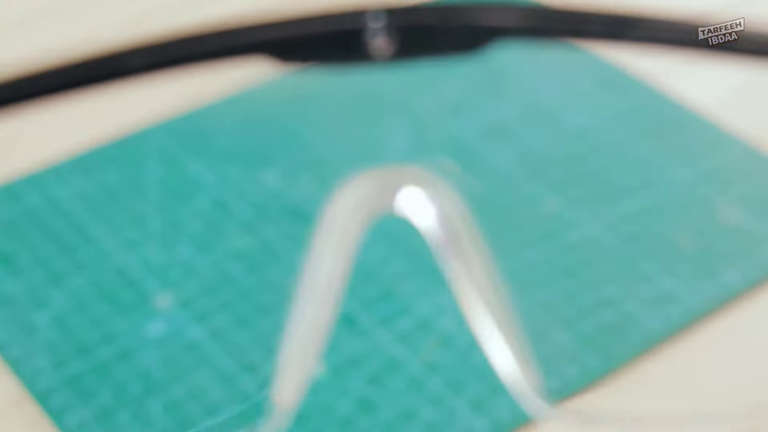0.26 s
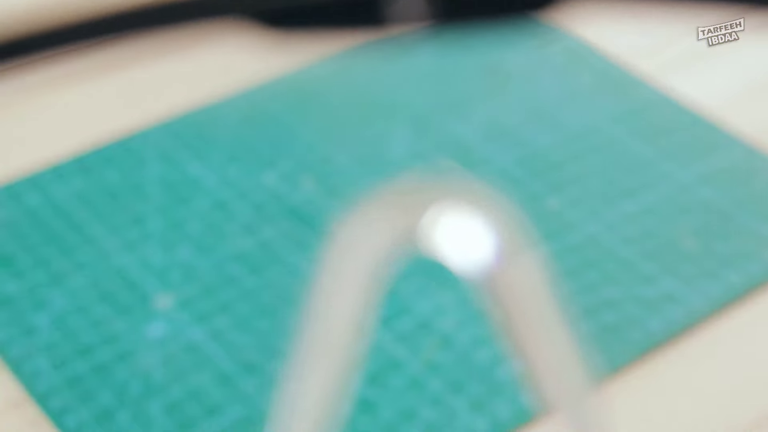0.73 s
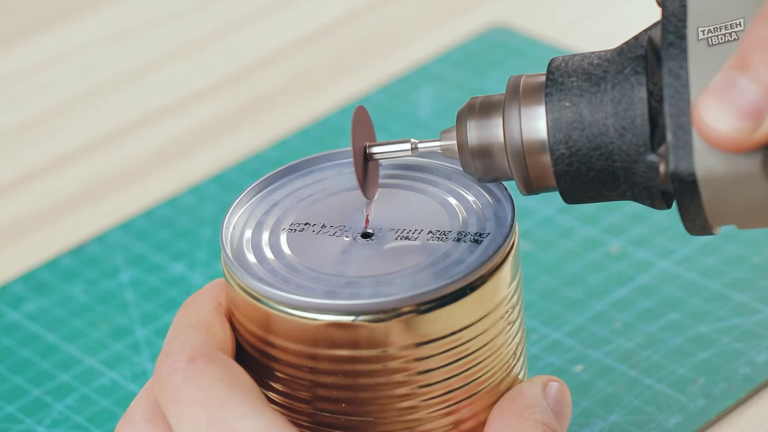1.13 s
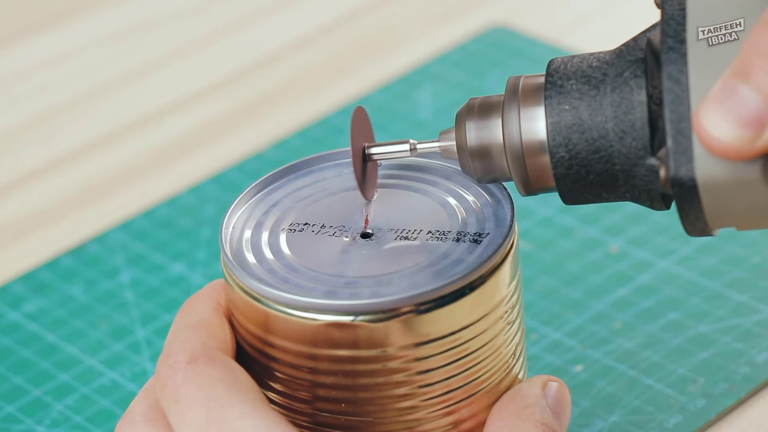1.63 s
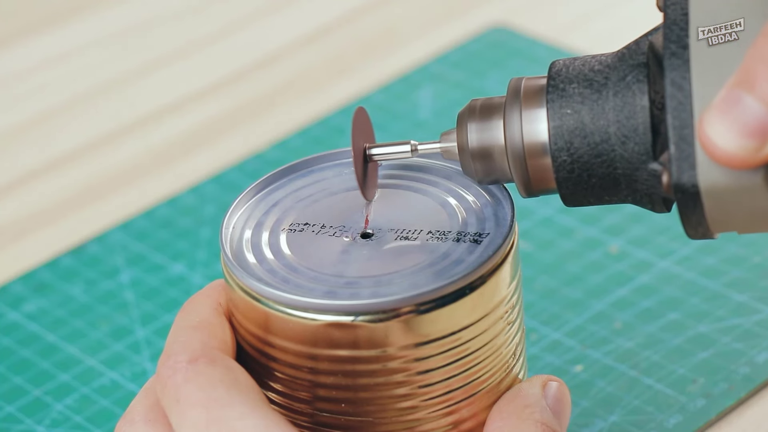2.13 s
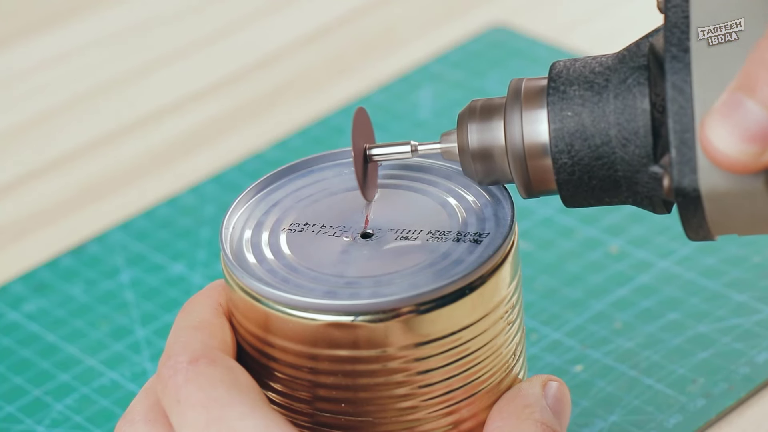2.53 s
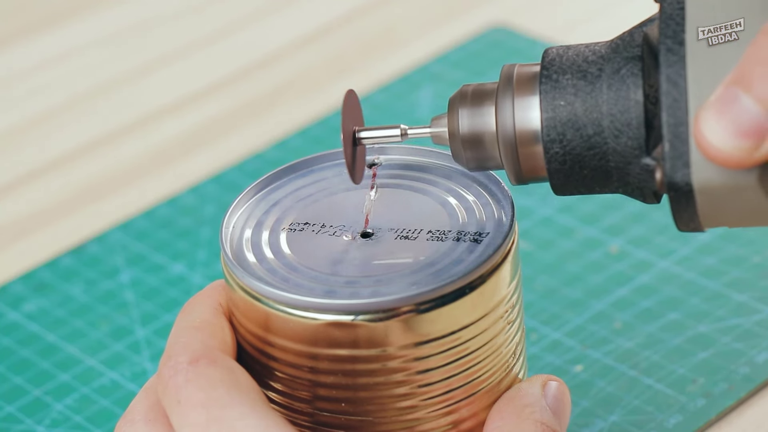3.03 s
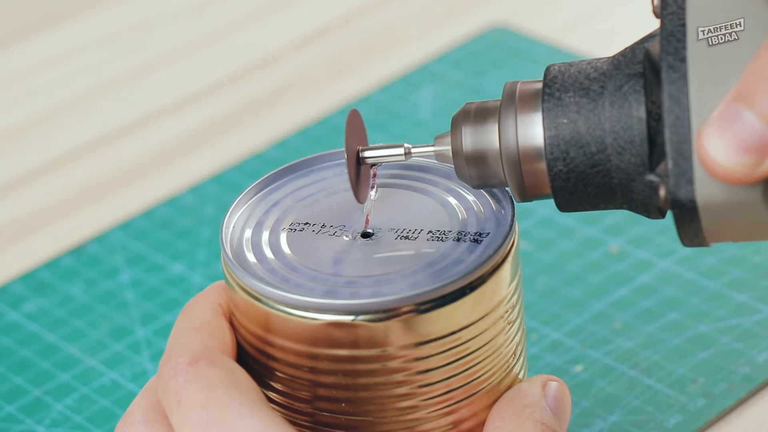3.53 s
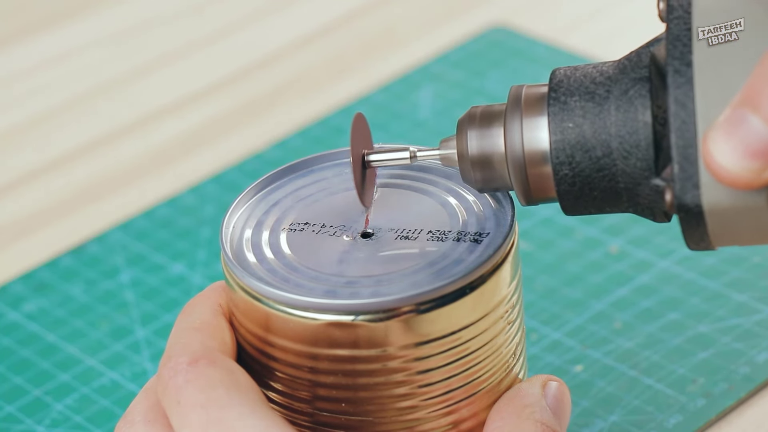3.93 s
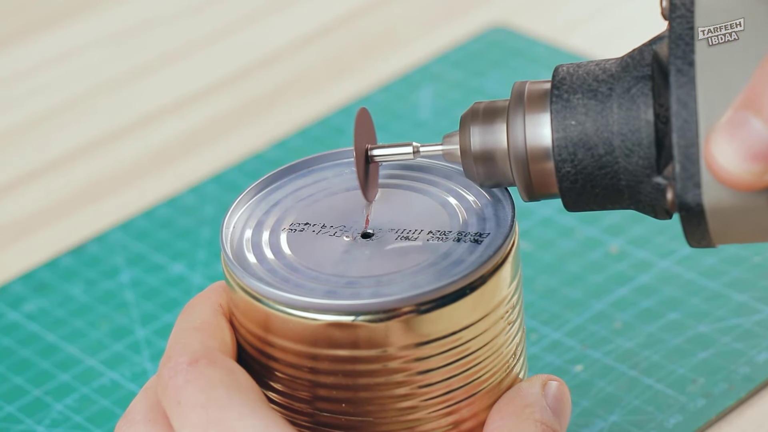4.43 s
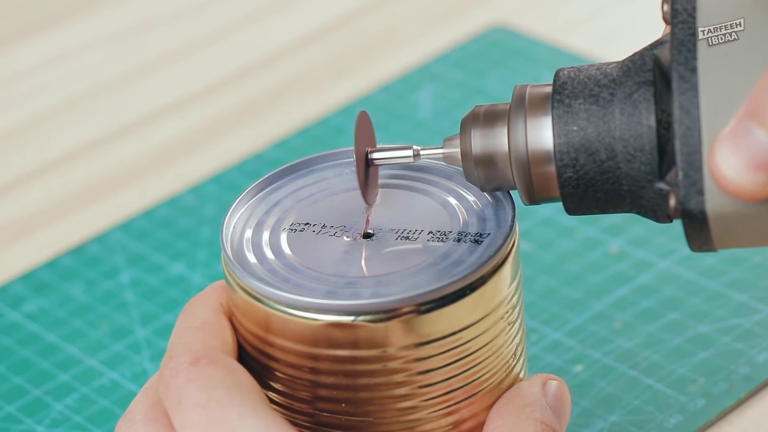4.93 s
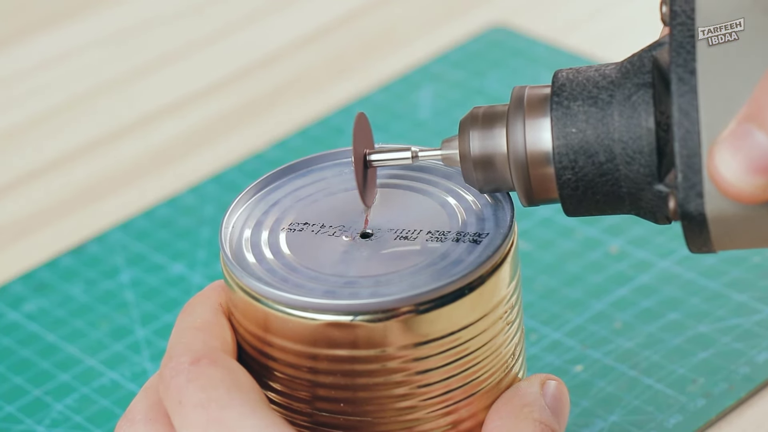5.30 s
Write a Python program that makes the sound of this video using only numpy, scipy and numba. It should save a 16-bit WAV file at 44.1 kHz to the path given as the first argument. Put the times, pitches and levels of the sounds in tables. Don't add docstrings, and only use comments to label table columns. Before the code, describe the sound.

For the first second there is only very quiet indoor air with a faint, thin distant appliance tone. At about 1.04 s a small rotary tool abruptly bites a steel can lid, close up: a loud, bright, nasal buzz around 295 turns a second, rich in ringing metallic overtones, shifting squeals, gritty scrape and a low shudder. Pressure swells and eases as the pitch sags to about 260 by 2.9 s. The disc lifts near 3 s; the ring fades within a fraction of a second while the motor spins up, leaving a much quieter high electric whine and airy hiss. Two short rasping touches come at 3.7 and 3.82 s. From 3.94 s the second cut grows, starting high and slowing to about 266. After 4.5 s it becomes rougher, with alternating strong and weak strokes and sizzling treble, and presses hardest at the end, around 5.5 s, without stopping.

```python
import sys
import numpy as np
from scipy import signal
from scipy.io import wavfile
from scipy.ndimage import uniform_filter1d
from numba import njit

SR = 44100
rng = np.random.default_rng(int(sys.argv[2]) if len(sys.argv) > 2 else 0)


def transcribe(signal):
    frames = np.atleast_2d(signal).T
    limited = np.clip(frames, -1, 1)
    pcm = np.round(limited * 32767).astype(np.int16)
    wavfile.write(sys.argv[1], SR, pcm)


def ratio(d):
    e = np.asarray(d, float) / 20
    return 10 ** e


N = 245195
HOP, WINDOW = 128, 512
FRAMES = np.arange(N // HOP + 9) * HOP / SR
BINS_HZ = np.fft.rfftfreq(WINDOW, 1 / SR)

BAND_EDGES_HZ = 700, 2400, 3300, 7500, 15700
# f/Hz, level/dB per Hz
LID_COLOUR = [(410, -73), (700, -72), (807, -24), (2470, -24.5), (2920, -17.5), (3280, -21), (3790, -13.5),
              (7740, -15.5), (8920, -9.5), (15600, -17.5)]
# f/Hz, width/Hz, level/dB
LID_MODES_FIRST = [(1695.5, 17.3, 18.5), (2830, 225, 15.5), (3070, 7.8, -11), (4027, 24, 0),
                   (3854, 8.3, 12), (4280, 160, 6.5), (4780, 27, 2), (5840, 64, -14), (6950, 22, -11),
                   (8670, 360, 4), (10200, 38, -12), (10900, 81, 2), (11140, 72, 10.5)]
# f/Hz, width/Hz, level/dB
LID_MODES_SECOND = [(1730, 12, -1), (2910, 43, 6), (3576, 50, 4.5), (4190, 120, 4), (5060, 67, 0),
                    (5630, 26, -10), (5960, 13, 8), (6940, 200, 2.5), (8160, 274, 8), (8560, 13, 7.5),
                    (10520, 41, 11), (11160, 160, 6), (13100, 13, 0), (14000, 180, 4), (14500, 42, -4)]
# shaft order/1, level/dB
COMMUTATOR_ORDERS = [(11.14, -73), (11.57, -54.5), (12, -52.5), (12.43, -55), (13, -62), (17, -71),
                     (24, -52.5), (24.43, -74), (25, -81), (35, -79), (36, -64), (37, -84), (47, -69),
                     (48, -53.5), (49, -70), (50, -75)]
# f/Hz, level/dB per Hz
FAN_COLOUR = [(150, -44), (260, -18.5), (400, -15), (942, -10), (1590, -6.5), (1850, -4.5), (2230, -6),
              (3470, 3.5), (5670, -8.5), (6950, -1), (8380, -12.5), (12600, -13), (13900, -20),
              (14700, -60)]
# f/Hz, level/dB per Hz
ROOM_COLOUR = [(88, -52), (150, -34), (243, -7.5), (303, -5), (333, -11), (473, -2.5), (529, -8), (673, -4),
               (1220, -11.5), (1440, -2.5), (1580, -16), (2150, -13), (2400, -11.5), (4500, -29.5),
               (6000, -35), (7600, -31), (12600, -29.5), (16400, -74), (22000, -120)]
# f/Hz, rms level/dB
APPLIANCE_LINES = [(1260, -84), (1396, -88), (1410, -82), (1740, -85.5), (1486, -87.5)]
# f/Hz, likeness/1
NEAR_LIKENESS = [(60, 0.91), (180, 0.33), (550, 1), (1650, 0.92), (4970, 0.78), (15000, 0.048)]
# f/Hz, level/dB
LEFT_LEAN = [(60, -6), (180, 5), (550, -3.5), (1650, -3.5), (4970, -0.1), (15000, -2.5)]
# f/Hz, likeness/1
FAR_LIKENESS = [(100, 0.29), (300, 1), (640, 0.61), (1400, 0.25), (3100, -0.1), (6800, -0.3), (15000, 0.99)]
# t/s, held/s, level/dB, rise/dB per s
TOUCHES = [
    (3.697, 0.066, -47, 2500),
    (3.82, 0.0088, -44.5, 600),
]
# t/s, f/Hz
SPEED_FIRST = [
    (1.038, 295.9),
    (1.112, 293.2),
    (1.844, 279.3),
    (2.286, 268.7),
    (2.604, 267.6),
    (2.904, 260.9),
    (2.97, 261.1),
]
# t/s, f/Hz
SPEED_SECOND = [
    (3.96, 296.6),
    (4.12, 296.6),
    (4.338, 292.5),
    (4.626, 283.2),
    (4.782, 276.0),
    (4.934, 271.2),
    (5.108, 268.3),
    (5.56, 266.2),
]
# f/Hz, level/dB per Hz
RUMBLE_COLOUR = [(15, -44), (25, -14), (48, -16), (113, -28), (155, 16), (200, 14), (260, -10), (440, -120)]
# t/s, level/dB
CAN_HOLD = [
    (1.6, 6),
    (1.75, -8),
    (2.7, 1),
    (2.85, 4),
    (3.7, -12),
    (4.9, 1),
]
# t/s, level/dB
PRESSURE_FIRST = [
    (1.04, -32.5),
    (1.12, -34),
    (1.5, -36.5),
    (1.85, -34),
    (2.1, -34),
    (2.55, -39.5),
    (2.75, -36),
    (2.86, -38.5),
    (2.96, -38),
]
# t/s, level/dB
PRESSURE_SECOND = [
    (3.936, -44.5),
    (3.97, -41.5),
    (4.2, -37),
    (4.45, -39.5),
    (4.62, -36),
    (4.74, -37),
    (4.92, -34),
    (5.3, -35),
    (5.56, -32),
]
# t/s, length/s, order/1, level/dB
HUM_LULLS = [
    (3.23, 0.053, 1, -5),
    (3.52, 0.15, 1, -8),
]
# low lid level/dB, main mode level/dB, fizz level/dB
BAND_SHARES = [
    (-11, -4, -2),
    (-13.5, -3, 1),
]
CHATTER_SHARES = -5.5, -7, -0.5
# t/s, length/s, order/1, level/dB
SQUEALS_FIRST = [(1.05, 0.2, 25, 7), (1.04, 0.17, 17, 10.5), (1.05, 0.22, 36, 11.5), (1.05, 0.19, 6, 9),
                 (1.04, 0.64, 10, 8), (1.17, 0.25, 10, 4.5), (1.18, 0.085, 30, 15), (1.2, 0.18, 29, 13),
                 (1.29, 0.18, 24, 6), (1.3, 0.22, 14, -9), (1.32, 0.26, 23, 12), (2.42, 0.24, 15, 14),
                 (1.35, 0.12, 25, 14.5), (1.45, 0.17, 22, 11), (1.48, 0.11, 35, 9), (1.61, 0.14, 16, 7),
                 (1.64, 0.2, 24, 7.5), (1.72, 0.12, 25, 10), (1.73, 0.074, 31, 7.5), (1.88, 0.08, 15, 9),
                 (1.87, 0.076, 21, 9.5), (2.25, 0.5, 11, 6.5), (2.02, 0.14, 33, 16.5),
                 (2.22, 0.61, 19, 5.5), (2.23, 0.33, 34, 13.5), (2.24, 0.38, 26, 6), (2.27, 0.48, 14, 5),
                 (2.35, 0.49, 40, 8), (2.69, 0.2, 26, 10), (2.72, 0.15, 38, 11)]
# t/s, length/s, order/1, level/dB
SQUEALS_SECOND = [(3.712, 0.14, 17, 9), (3.7, 0.11, 28, 4.5), (3.69, 0.43, 13, 11), (3.7, 0.11, 28, 7.5),
                  (3.927, 0.24, 17, 8.5), (3.97, 0.33, 4, 4.5), (4.0, 0.17, 29, -10), (4.09, 0.18, 25, 13),
                  (4.153, 0.5, 6, 12), (4.17, 0.11, 30, 10.5), (4.18, 0.25, 36, 7),
                  (4.183, 0.078, 17, 11.5), (4.27, 0.26, 10, 7.5), (4.34, 0.28, 37, 8.5),
                  (4.46, 0.2, 13, 9), (4.398, 0.19, 8, 6), (4.573, 0.3, 18, 6.5), (5.2, 0.13, 26, 7),
                  (4.88, 0.27, 11, 6), (4.95, 0.51, 8, 10), (4.91, 0.21, 13, 13.5), (4.95, 0.21, 49, 20),
                  (5.07, 0.049, 16, 6), (5.14, 0.067, 33, 17.5), (5.16, 0.26, 47, 6), (3.75, 0.14, 8, 10),
                  (4.376, 0.068, 37, 10), (5.42, 0.165, 40, 4), (5.6, 0.27, 33, 8)]
# t/s, length/s, order/1, level/dB
GRIP_CHANGES = [(1.1, 0.9, 1, 13.5), (1.49, 0.024, 1, -4), (1.69, 0.044, 1, -5.5), (2.13, 0.012, 1, -16),
                (2.74, 0.16, 1, 10), (3.02, 0.21, 1, 9.5), (3.02, 0.1, 2, 6.5), (3.7, 0.46, 1, -18),
                (4.5, 0.31, 1, 8.5), (5.45, 0.12, 1, 2.5), (1.38, 0.097, 2, -7), (1.59, 0.029, 2, -11),
                (2.05, 0.0068, 2, -10), (2.24, 0.063, 2, -8.5), (2.3, 0.38, 2, 3.5), (2.8, 0.15, 2, -4),
                (3.7, 0.97, 2, -2.5), (4.5, 0.013, 2, -9), (5.0, 0.2, 2, -5)]
# t/s, length/s, order/1, level/dB
MORE_SQUEALS = [(1.02, 0.059, 10, 1), (1.034, 0.027, 14, 6), (3.4, 0.13, 11, 12), (4.39, 0.06, 14, 9),
                (7.6, 0.053, 15, 8), (2.9, 0.13, 11, 4.5), (4.42, 0.042, 13, 6), (5.406, 0.18, 26, 5.5),
                (5.32, 0.24, 47, 3.5), (1.23, 0.18, 8, 8), (1.646, 0.15, 4, 10), (2.37, 0.15, 19, 8.5),
                (0.92, 0.044, 3, 18), (2.3, 0.45, 6, -13), (2.26, 0.44, 7, -9), (2.86, 0.13, 9, 6.5),
                (2.836, 0.26, 3, 15.5), (3.1, 0.23, 4, 14), (7.1, 0.069, 36, 32), (3.5, 0.33, 5, 1),
                (2.4, 0.83, 4, -5)]
# t/s, length/s, order/1, level/dB
ORDER_SHIFTS_FIRST = [(1.04, 0.19, 18, -8), (1.04, 0.28, 12, -7), (1.04, 0.42, 38, -6), (1.06, 0.8, 22, -3.5),
                      (1.06, 0.54, 37, 7), (1.08, 0.27, 34, 7.0), (1.14, 0.065, 16, -5), (1.2, 0.38, 13, 8),
                      (1.16, 0.62, 30, -1.5), (1.16, 0.88, 19, -6), (1.2, 0.39, 17, -1.5), (2.15, 0.13, 20, -10),
                      (1.32, 0.72, 33, -11), (1.34, 0.52, 7, 5.5), (1.1, 0.9, 20, -3), (1.36, 0.067, 12, 6),
                      (1.42, 0.96, 6, -3), (1.46, 0.14, 16, 5.5), (1.5, 0.12, 11, 5), (1.5, 0.21, 38, 8),
                      (1.5, 0.29, 25, -2), (1.52, 0.74, 12, -6.5), (1.56, 0.98, 10, -2.5), (1.68, 0.16, 23, -3),
                      (1.74, 0.17, 11, 2), (1.9, 0.8, 35, -2), (1.84, 0.11, 15, -3), (1.84, 0.8, 8, -9),
                      (1.92, 0.58, 29, -12), (1.94, 0.67, 31, -10), (1.94, 1, 16, -7), (1.96, 0.097, 26, -20),
                      (2.04, 1, 22, -2), (2.06, 0.17, 11, 3), (2.1, 0.17, 17, -11), (2.15, 0.13, 21, -8),
                      (2.18, 0.59, 23, -10), (2.18, 0.8, 18, 2), (2.22, 0.99, 25, 2), (2.22, 1, 34, -3.5),
                      (2.28, 0.48, 13, 6), (2.34, 0.2, 16, 8), (2.36, 0.33, 24, -19), (2.44, 0.11, 14, 2),
                      (2.62, 0.13, 17, 2), (2.68, 0.36, 12, 4.5), (2.68, 0.15, 15, -3), (2.7, 0.15, 42, -5),
                      (2.82, 0.24, 43, -18)]
# t/s, length/s, order/1,
# level/dB
ORDER_SHIFTS_MOSTLY_SECOND = [(3.69, 0.096, 34, 18), (3.677, 0.334, 33, 18.5), (3.68, 0.52, 45, 8.5),
                              (3.68, 0.7, 43, 10.5), (3.68, 0.877, 29, -8), (3.702, 0.41, 23, -3), (3.713, 0.58, 39, -5),
                              (3.7, 0.98, 48, -11), (3.72, 0.63, 27, 2), (3.713, 0.69, 26, -5), (3.738, 0.92, 28, 9.5),
                              (3.785, 0.15, 10, -11), (3.8, 0.79, 32, -14), (3.8, 0.94, 52, -5), (3.8, 0.98, 30, 0),
                              (3.94, 0.51, 44, -13), (3.99, 0.16, 21, 10.5), (4.082, 0.64, 51, -14), (4.122, 0.19, 14, -8),
                              (4.238, 0.15, 18, -11.5), (4.26, 0.4, 31, 7.5), (4.384, 0.28, 37, -7), (4.38, 0.98, 21, -4),
                              (4.433, 0.27, 12, 6.5), (4.457, 0.53, 33, -21), (2.66, 0.32, 20, -7),
                              (4.534, 0.066, 40, 13.5), (4.544, 0.14, 10, -7.5), (4.618, 0.2, 22, -18), (4.62, 1, 35, -20),
                              (4.66, 0.77, 13, -4.5), (4.46, 0.69, 20, 5), (4.734, 0.15, 19, -7), (4.736, 0.19, 31, -21),
                              (4.86, 0.3, 46, 6), (4.755, 1, 17, -8), (4.815, 0.84, 25, -10), (4.88, 0.27, 48, -16),
                              (4.96, 0.3, 49, -5), (4.962, 0.42, 54, 10), (5.04, 0.42, 50, 11), (5.178, 0.4, 32, -11),
                              (5.2, 0.174, 51, 8), (5.22, 0.11, 26, 4.5), (5.243, 0.27, 40, 2), (5.277, 0.26, 23, -18),
                              (1.72, 0.15, 40, 1), (5.355, 0.23, 11, -6.5)]
# t/s, length/s, order/1, level/dB
ORDER_SHIFTS_MORE = [(1.06, 0.1, 8, -16), (1.1, 0.22, 25, -1), (1.17, 0.54, 29, -4.5), (3.3, 0.74, 15, 1),
                     (5.08, 0.48, 15, -3), (5.4, 0.11, 37, 13), (1.5, 0.63, 9, -5.5), (1.606, 0.13, 8, 9.5),
                     (6.5, 0.55, 18, -15), (1.776, 0.12, 14, 8.5), (5.32, 0.13, 30, -11), (1.84, 0.096, 15, 0),
                     (2, 0.255, 14, -6), (2.04, 0.13, 33, -7), (2.1, 0.71, 5, -5), (2.1, 0.47, 10, -3.5),
                     (5.34, 0.22, 37, -9), (2.403, 0.18, 14, -0.5), (4.66, 0.071, 38, 8.5), (3.7, 0.29, 33, -4.5),
                     (3.7, 0.62, 9, -3.5), (3.7, 0.85, 27, -5), (4.7, 0.48, 11, -2.5), (3.82, 0.75, 28, -7.5),
                     (3.77, 0.366, 25, -6), (4.18, 0.09, 6, 6), (4.4, 0.18, 10, -2.5), (4.2, 0.78, 28, -7),
                     (4.4, 0.32, 29, -7), (4.9, 0.12, 30, -3), (4.52, 0.86, 6, -6.5), (5, 0.27, 36, -18),
                     (4.637, 0.59, 9, -12), (1.26, 0.8, 18, 4.5), (2.42, 0.48, 33, 5)]

START_S, LIFT_S, RING_END_S = 1.0384, 2.98, 3.22
CHATTER_S, CHATTER_RISE_S = 4.47, 1
GRAINY_ORDER = 55


def cutting(hz, turns):
    t = np.arange(N) / SR
    grit_db, chatter_db, skid_db, skid_s = -13, 1, 7, 2.88
    skid = np.clip((t - skid_s) / 0.11, 0, 1) * (t < RING_END_S)
    share = ratio(grit_db + chatter_db * (t > CHATTER_S) + skid_db * skid)
    touching = np.clip(np.maximum(RING_END_S - t, t - TOUCHES[0][0] + .02) / .01, 0, 1)
    ringing = scrape(hz, turns)
    loose = grit(turns)
    loose *= np.std(ringing) / np.std(loose)
    contact = (ringing + share * loose + rumble()) / np.sqrt(1 + share ** 2)
    return ratio(pressure_db(t)) * touching * contact


def scrape(hz, turns):
    orders = np.arange(3, 60)
    lines = orders[:, None] * hz
    upper_gain = skip_depth() * np.cos(np.pi * turns)
    shape = stroke_shape(orders) * banded(lid_gain(lines, lift_db=1.0), lines)
    out = partials(orders, shape, turns)
    out += upper_gain * zero_phase(out, (1500, 8000), "band")
    bite = at_samples(np.interp(FRAMES, (4.75, 5.2), (.12, .2)))
    once_a_turn = (1 + bite * np.cos(2 * np.pi * turns)) / np.sqrt(1 + bite ** 2 / 2)
    return out + zero_phase(out, 3300, "high") * (once_a_turn - 1)


def stroke_shape(orders):
    smear, sway, sway_s = .55, .8, .3
    wander, wander_s, flutter, flutter_s = 0.64, 0.094, 0.47, 0.022
    row, mean_hz = orders[:, None], orders * 280
    squeal_db = lifts_db(SQUEALS_FIRST + SQUEALS_SECOND + MORE_SQUEALS, orders)
    shift_db = lifts_db(ORDER_SHIFTS_FIRST + ORDER_SHIFTS_MOSTLY_SECOND + ORDER_SHIFTS_MORE, orders, taper=0, spread=0)
    phase = 2 * np.pi * (.5 + smear * (rng.random(len(orders)) - .5))
    apart = 1.82 * np.arccos(np.clip(read(NEAR_LIKENESS, mean_hz), 0, 1)) * rng.standard_normal(len(orders))
    steady = np.exp(1j * (phase + np.outer([.5, -.5], apart)))[..., None]
    swing = sway * ratio(-squeal_db.clip(0)) * np.minimum(row / 4, 1) * paired(mean_hz, sway_s)[0].real
    steady = steady * np.exp(1j * swing * np.array([1, -1])[:, None, None])
    drift = wander * paired(mean_hz, wander_s) + flutter * paired(mean_hz, flutter_s)
    drift_gain = ratio(squeal_db * (1 + row / GRAINY_ORDER) / 2)
    return (steady * ratio(squeal_db) + drift * drift_gain) * ratio(shift_db)


def grit(turns):
    gating, tilt_db, patchy_db = 0.26, 1.1, 3.5
    bins = BINS_HZ[:, None] + 0 * FRAMES
    patches = uniform_filter1d(rng.standard_normal(bins.shape), 5, 0)
    patches = evened(uniform_filter1d(patches, 24, 1))
    colour = lid_gain(bins, lift_db=0.) * ratio(patchy_db * patches)
    colour = banded(colour, bins, most_db=-1.5)
    treble_db = np.interp(bins, (5500, 9500), (0, 6.5)) + tilt_db * np.log2(bins / 5000 + 0.0054)
    pulse = 1 + gating * np.cos(2 * np.pi * turns) + skip_depth() * np.cos(np.pi * turns)
    return hiss(colour * ratio(treble_db)) * pulse


def rumble():
    hold_db = at_samples(column(CAN_HOLD, 1, FRAMES))
    return ratio(-55 + hold_db) * evened(hiss(ratio(read(RUMBLE_COLOUR, BINS_HZ))[:, None]))


def lid_gain(hz, lift_db):
    blur = 1.52
    first, second = (sum(ratio(db + lift_db) ** 2 / (1 + (2 * (hz - f) / (blur * width)) ** 2)
                         for f, width, db in modes) for modes in (LID_MODES_FIRST, LID_MODES_SECOND))
    modes = np.where(FRAMES < RING_END_S, first, second)
    return ratio(read(LID_COLOUR, hz)) * np.sqrt(1 + modes) * leaned(hz)


def banded(gain, hz, most_db=20):
    low, main, fizz = (np.where(FRAMES < RING_END_S, first, second) + change * wear(FRAMES)
                       for first, second, change in zip(*BAND_SHARES, CHATTER_SHARES))
    shares_db = low, np.minimum(main, most_db), 0, fizz
    out = np.zeros(gain.shape)
    for lo, hi, share_db in zip(BAND_EDGES_HZ, BAND_EDGES_HZ[1:], shares_db):
        part = gain * ((hz >= lo) & (hz < hi))
        power = (part ** 2).mean(0).sum(0)
        out += part * ratio(share_db) / np.sqrt(power + 1e-20)
    return out


def pressure_db(t):
    bite, ring, slip = 2522, 147, 221
    tail_db, tail = -9, 68
    lifted = np.maximum(t - PRESSURE_FIRST[-1][0], 0)
    first = column(PRESSURE_FIRST, 1, t) - np.minimum(ring * lifted, -tail_db + tail * lifted)
    second = column(PRESSURE_SECOND, 1, t) - bite * np.maximum(PRESSURE_SECOND[0][0] - t, 0)
    levels = [first, second]
    for s, held, db, rise in TOUCHES:
        levels.append(db - rise * np.maximum(s - t, 0) - slip * np.maximum(t - s - held, 0))
    return np.max(levels, axis=0)


def wear(t):
    return np.clip((t - CHATTER_S) / CHATTER_RISE_S, 0, 1)


def skip_depth():
    return at_samples(.03 + .36 * wear(FRAMES))


def chatter(t):
    end_s, fall_s = 5.52, 0.39
    return wear(t) * np.clip((end_s - t) / fall_s, 0, 1)


def lifts_db(events, orders, edge_s=.025, taper=.2, spread=1.5):
    lift = np.zeros((len(orders), len(FRAMES)))
    for s, length, order, db in events:
        reach = .1 + spread * (order / GRAINY_ORDER) ** 4
        near = np.exp(-((orders - round(order)) / reach) ** 2)
        rise = (FRAMES - s) / edge_s + 1
        fall = (s + length - FRAMES) / (edge_s + taper * length) + .7
        lift += db * near[:, None] * np.clip(np.minimum(rise, fall), 0, 1)
    return lift


def shaking(turns):
    orders = np.arange(1, 5) / 2
    row, mean_hz = orders[:, None], orders * 280
    grip_db = lifts_db(GRIP_CHANGES, np.arange(1, 3), edge_s=0.057, taper=0)
    wobble, twice = ratio(pressure_db(FRAMES) + grip_db)
    idle = ratio(-80.5 + lifts_db(HUM_LULLS, np.ones(1))[0])
    skips = chatter(FRAMES)
    levels = np.array([ratio(-81.5) * (skips > 0) * (FRAMES > 4.97),
                       ratio(-29.5) * wobble + idle,
                       ratio(-73) * np.sqrt(skips),
                       ratio(-14.5) * twice])
    shudder = .05 + .08 * skips + .9 * (row == 3 / 2)
    unsteady = 1 + 0.29 * paired(mean_hz, 0.088) + shudder * paired(mean_hz, 0.0075)
    return partials(orders, levels * unsteady * leaned(row * 280), turns)


def motor(hz, turns):
    wander, blur, flutter = .2, .4, .2
    shell_hz, shell_width_hz = 3540, 230
    orders, levels_db = np.transpose(COMMUTATOR_ORDERS)
    row, mean_hz = orders[:, None], orders * 280
    low = row < 14
    apart = rng.uniform(0.91, 1.0, len(orders))
    shape = np.exp(1j * np.outer([1, -1], apart))[..., None] + wander * paired(mean_hz, 0.018, FAR_LIKENESS)
    shape = shape + blur * low * paired(mean_hz, 0.01, FAR_LIKENESS)
    shell = np.where(low, 1 / (1 + ((row * hz - shell_hz) / shell_width_hz) ** 2), 1)
    loaded_s = np.maximum(RING_END_S - FRAMES, FRAMES - PRESSURE_SECOND[0][0])
    load_db = -7 * np.clip(loaded_s / .15, 0, 1)
    fan = hiss(ratio(read(FAN_COLOUR, BINS_HZ))[:, None], FAR_LIKENESS)
    fan = evened(fan * (1 + flutter * np.cos(2 * np.pi * turns)))
    fan = highpass(ratio(-51 + at_samples(load_db)) * fan, 6, 230)
    return partials(orders, ratio(levels_db[:, None] + load_db) * shape * shell, turns) + fan


def shaft_turns(let_go_s):
    top_hz, freed_s, spin_up_s = 299, 2.98, .4
    last_s, last_hz = SPEED_FIRST[-1]
    free = top_hz - (top_hz - last_hz) * np.exp(-(FRAMES - freed_s) / spin_up_s)
    loaded = column(SPEED_FIRST + SPEED_SECOND, 1, FRAMES)
    hz = np.where((FRAMES > let_go_s) & (FRAMES < SPEED_SECOND[0][0]), free, loaded)
    hz[(FRAMES > last_s) & (FRAMES <= let_go_s)] = last_hz
    return hz, np.cumsum(at_samples(hz)) / SR


def room():
    air = evened(hiss(ratio(read(ROOM_COLOUR, BINS_HZ))[:, None], FAR_LIKENESS))
    air = highpass(ratio(-66.5) * air, 1, 150)
    hz, db = np.transpose(APPLIANCE_LINES)
    gains = ratio(db)[:, None] * (1 + 0.82 * paired(hz, 0.3))
    return air + partials(hz, gains, np.arange(N) / SR)


def partials(orders, gains, turns):
    return np.sqrt(2) * spin(orders * 1., np.ascontiguousarray(gains.transpose(2, 0, 1)), turns, HOP)


@njit
def spin(orders, gains, turns, hop):
    out = np.zeros((2, len(turns)))
    for n in range(len(turns)):
        frame, u = n // hop, (n % hop) / hop
        for k in range(len(orders)):
            phasor = np.exp(-2j * np.pi * orders[k] * turns[n])
            for ch in range(2):
                gain = gains[frame, ch, k] * (1 - u) + gains[frame + 1, ch, k] * u
                out[ch, n] += (gain * phasor).real
    return out


def hiss(gain, likeness=NEAR_LIKENESS):
    z = paired(BINS_HZ, likeness=likeness) * gain
    return signal.istft(z, nperseg=WINDOW, noverlap=WINDOW - HOP)[1][:, :N]


def paired(hz, smooth_s=0., likeness=NEAR_LIKENESS):
    a, b, c, d = rng.standard_normal((len(FRAMES), len(hz), 4)).T
    same = np.clip(read(likeness, hz), -1, 1)[:, None]
    left = a + 1j * b
    right = same * left + np.sqrt(1 - same ** 2) * (c + 1j * d)
    bell = np.exp(-(np.fft.fftfreq(len(FRAMES), HOP / SR) * smooth_s) ** 2)
    return evened(np.fft.ifft(np.fft.fft(np.array([left, right])) * bell))


def leaned(hz):
    return ratio(np.array([.5, -.5])[:, None, None] * read(LEFT_LEAN, hz))


def zero_phase(x, hz, kind):
    return signal.sosfiltfilt(signal.butter(2, hz, kind, fs=SR, output="sos"), x)


def highpass(x, order, hz):
    return signal.sosfilt(signal.butter(order, hz, "high", fs=SR, output="sos"), x)


def evened(x):
    return x / np.sqrt(np.mean(abs(x) ** 2) + 1e-20)


def read(points, hz):
    f, value = np.transpose(points)
    return np.interp(np.log(hz + 1), np.log(f + 1), value)


def column(rows, index, t):
    table = np.array(rows)
    return np.interp(t, table[:, 0], table[:, index])


def at_samples(x):
    return np.interp(np.arange(N) / SR, FRAMES, x)


def scene():
    hz, turns = shaft_turns(RING_END_S)
    running = np.clip((np.arange(N) / SR - START_S) / 0.00057, 0, 1)
    tool = cutting(hz, turns) + shaking(turns) + motor(*shaft_turns(LIFT_S))
    return room() * (1 - running) + running * tool


def roll_off(x):
    return signal.sosfilt(signal.butter(12, 16680, fs=SR, output="sos"), x)


def record(dry):
    edge = signal.firwin(401, 15600, window=("kaiser", 9), fs=SR)
    mix = signal.oaconvolve(dry, edge[None], "same")
    return roll_off(mix)


dry = scene()
out = record(dry)
transcribe(out)
```